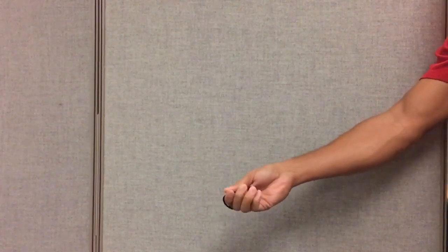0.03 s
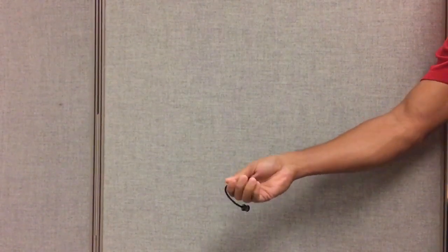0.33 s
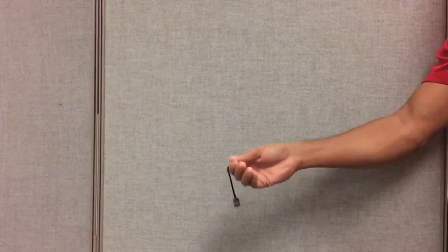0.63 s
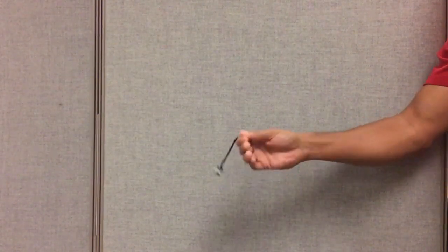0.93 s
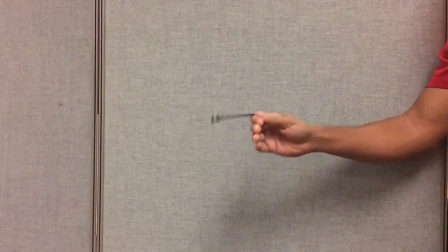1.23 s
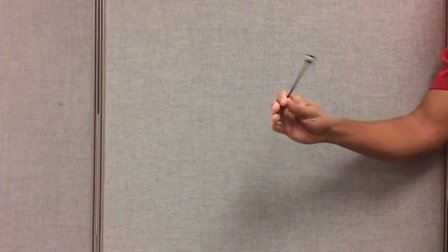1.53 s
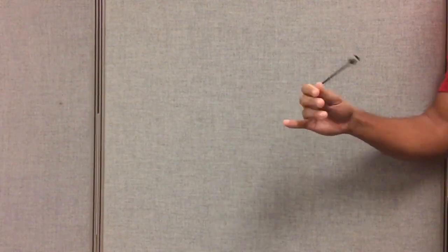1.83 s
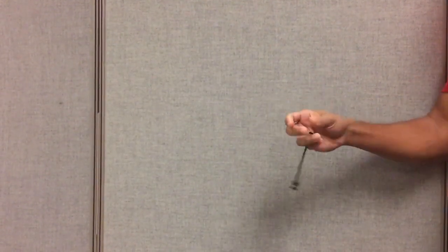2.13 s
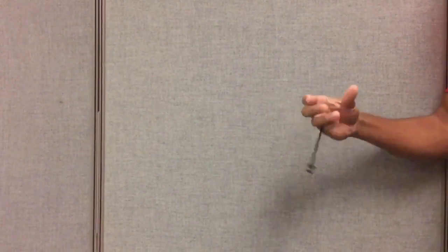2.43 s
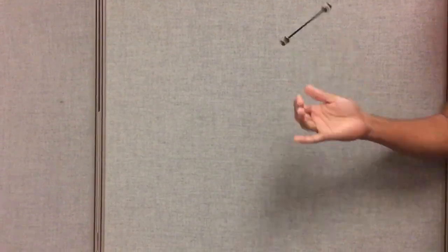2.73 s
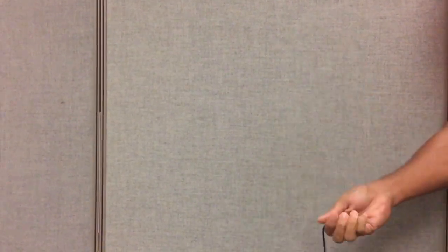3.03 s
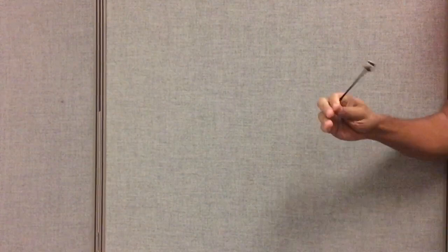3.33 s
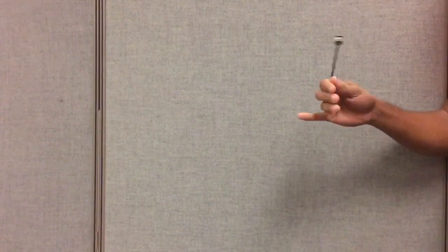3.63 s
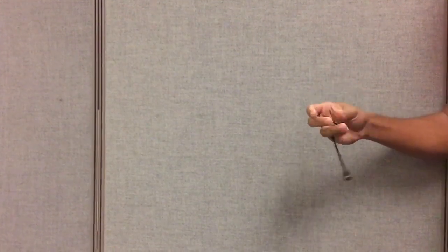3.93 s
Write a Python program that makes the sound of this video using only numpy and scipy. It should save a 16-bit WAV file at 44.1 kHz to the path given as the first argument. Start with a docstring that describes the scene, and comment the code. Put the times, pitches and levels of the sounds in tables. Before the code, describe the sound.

Low indoor air hiss rises abruptly and stays, under a few faint bead ticks and rustles.

```python
"""A small, quiet room, where a hand flips a cord toy with two end beads.
Near silence at first; about 1.7 s in, the ventilation comes up abruptly and stays: a bed of
duct rumble, air hiss and wavering fan tones. The beads knock softly on the fingers and give
a few faint, hard clicks, while the cord scuffs and slides over the skin in tiny slips.
A short, damped room tail sits behind the toy."""
import sys
import numpy as np
from scipy import signal
from scipy.fft import rfft, irfft
from scipy.io import wavfile

SR = 44100
rng = np.random.default_rng(int(sys.argv[2]) if len(sys.argv) > 2 else 0)


def generate_wav(sig):
    """Save sig (samples, or channels by samples) to the path in sys.argv[1] as 16-bit PCM at SR."""
    pcm = np.round(np.clip(np.atleast_2d(sig).T, -1, 1) * 32767).astype(np.int16)
    wavfile.write(sys.argv[1], SR, pcm)


N = 176400

# room tone spectrum (frequency [Hz], relative level [dB])
ROOM_TONE_SPECTRUM = [(2, -21), (9, 0), (25, -10), (65, -35), (100, -34.5), (300, -49.5), (550, -54.5),
                      (850, -56.5), (1300, -61.5), (2050, -63.5), (2250, -79.5), (15000, -90.5)]
# room tone fader (time [s], level [dB])
ROOM_TONE_FADER = [(0, -56), (1.55, -56.5), (1.8, -79)]
# beads landing on the fingers (time [s], level [dB], pitch [Hz], decay to -60 dB [s])
FINGER_KNOCKS = [(1.4242, -58.5, 1300, 0.014), (1.4304, -59.5, 1065, 0.022), (1.435, -66, 863, 0.038),
                 (1.444, -80, 2390, 0.034), (1.454, -84.5, 4510, 0.029), (1.5658, -66, 4550, 0.0088),
                 (1.567, -70, 1110, 0.066), (1.571, -71, 2850, 0.034), (1.579, -77.5, 6240, 0.0084)]
# bands of cord rubbing on skin; those near 1.84 s are one rub, coloured by mic and room
# (time [s], length [s], level [dB], low edge [Hz], high edge [Hz])
RUB_BANDS = [(1.44, 0.034, -82, 740, 2530), (1.447, 0.13, -99, 2220, 4220), (1.557, .03, -86, 2210, 6200),
             (1.591, 0.15, -101, 2940, 7900), (1.834, 0.14, -79.5, 5600, 7200),
             (1.838, 0.13, -80, 7650, 10100), (1.841, 0.16, -85, 9700, 14500),
             (1.849, 0.14, -82, 2500, 5000), (2.405, 0.045, -90, 10000, 15500),
             (3.041, .015, -82, 8500, 15500), (3.104, 0.072, -84, 5500, 15400),
             (3.306, 0.064, -83.5, 11000, 15000)]
# spectrum of the air in the duct (frequency [Hz], relative level [dB])
AIR_SPECTRUM = [(10, -36), (24, -31.5), (32, -24.5), (45, -12.5), (60, -1), (76, 3), (103, -10.5),
                (120, -11.5), (138, -3), (175, -15), (228, -15), (255, -23), (280, -22.5), (310, -25.5),
                (390, -30.5), (450, -35), (560, -38), (680, -31.5), (820, -40), (1230, -42), (2700, -52.5),
                (4300, -56), (4900, -59.5), (5600, -58), (6600, -58), (7500, -61.5), (8200, -60.5),
                (9900, -62), (10450, -67.5), (11000, -63.5), (15500, -65.5)]
# fan tones, ahead of the faders (frequency [Hz], level [dB])
FAN_TONES = [(74, -57), (139, -56), (223, -66), (277, -70), (367, -76), (392, -78), (757, -78), (912, -86),
             (1035, -90), (1111, -90), (1216, -91), (1244, -91), (1580, -92), (2041, -97)]
# fader for the ventilation's low end (time [s], gain [dB])
RUMBLE_FADER = [(1.3, -50), (1.45, -27.5), (1.55, -24.5), (1.62, -12.5), (1.67, -17), (1.72, 1), (1.77, -6),
                (1.85, -3), (2.1, 3.5), (2.4, -1), (4, -2)]
# fader for everything above the rumble (time [s], gain [dB])
HISS_FADER = [(1.45, -52), (1.6, -26.5), (1.67, -21.5), (1.71, -8), (1.76, -1), (1.82, .5), (2.1, 1),
              (2.4, 0), (4, 0.5)]
# hard bead contacts (time [s], peak level [dB])
BEAD_CLICKS = [(2.2763, -50.5), (3.0445, -65), (3.131, -67)]
# resonances of a bead (frequency [Hz], relative level [dB], decay to -60 dB [s])
BEAD_MODES = [(1450, -1, .018), (1900, -4, .016), (3950, -2, .018), (6600, -3, .009), (8300, -1, .005),
              (9400, -5, .005), (11100, -9, .008)]


def amp(db):
    """Decibels to gain."""
    return 10 ** (np.asarray(db) / 20)


def unit(x):
    """Scales to rms 1."""
    return x / np.sqrt(np.mean(abs(x) ** 2) + 1e-30)


def fader(points):
    """A gain ride through (time [s], level [dB]) points."""
    return amp(np.interp(np.arange(N) / SR, *np.transpose(points)))


def decay(t, t60):
    """An envelope that falls 60 dB in t60 seconds."""
    return np.exp(-np.log(1000) * t / t60)


def coloured(points):
    """Noise of rms 1, shaped by (frequency [Hz], level [dB]) points."""
    hz, db = np.transpose(points)
    bins_hz = np.fft.rfftfreq(N, 1 / SR)
    gain = amp(np.interp(np.log(bins_hz + 1), np.log(hz + 1), db))
    return unit(irfft(rfft(rng.standard_normal(N)) * gain, N))


def drift(hz):
    """Slow random motion of rms 1, rolling off above hz."""
    rolloff = np.exp(-(np.fft.rfftfreq(N, 1 / SR) / hz) ** 2)
    return unit(irfft(rfft(rng.standard_normal(N)) * rolloff, N))


def band(x, low_hz, high_hz):
    """Band-pass filter."""
    return signal.sosfilt(signal.butter(5, [low_hz, high_hz], "bandpass", fs=SR, output="sos"), x)


def room_tone():
    """A faint, dark noise floor that gives way to the ventilation."""
    return fader(ROOM_TONE_FADER) * coloured(ROOM_TONE_SPECTRUM)


def finger_knock(db, hz, t60, attack_s=.0006, grit_share=.6, band_ratio=1.35):
    """A bead lands on a finger: a damped ring roughened with grit around its pitch."""
    t = np.arange(SR // 10) / SR
    grit = unit(band(rng.standard_normal(len(t)), hz / band_ratio, hz * band_ratio))
    ring = (1 - grit_share) * np.sin(2 * np.pi * hz * t) + grit_share * grit
    return amp(db) * np.minimum(t / attack_s, 1) * decay(t, t60) * ring


def room_tail(x, t60=.22, wet_db=-6):
    """Diffuse reflections die away fast in a well-damped room."""
    t = np.arange(SR // 2) / SR
    tail = rng.standard_normal(len(t)) * decay(t, t60)
    return amp(wet_db) * signal.fftconvolve(x, tail / np.linalg.norm(tail))[:N]


def cord_rub(length, db, low_hz, high_hz, slips_per_s=1500, slip_share=.72):
    """One band of cord sliding on skin: smooth friction textured with tiny slips of the weave."""
    smooth, slip_sizes = rng.standard_normal((2, SR // 2))
    slips = unit(slip_sizes * (rng.random(SR // 2) < slips_per_s / SR))
    friction = unit(band((1 - slip_share) * smooth + slip_share * slips, low_hz, high_hz))
    progress = np.arange(0, length, 1 / SR) / length
    envelope = np.interp(progress, [0, .18, .7, 1], [0, 1, 1, 0])  # attack, hold, release
    return amp(db) * envelope * friction[:len(envelope)]


def ventilation(air_db=-44, waver_db=.5, waver_hz=17, sway_depth=.59, sway_hz=4.76, crossover_hz=105):
    """Rushing air and unsteady fan tones; the duct rumble comes up just ahead of the hiss."""
    t = np.arange(N) / SR
    air = amp(air_db + waver_db * drift(waver_hz)) * coloured(AIR_SPECTRUM)
    for hz, db in FAN_TONES:
        sway = 1 + sway_depth * (drift(sway_hz) + 1j * drift(sway_hz))  # level and phase wander
        tone = np.exp(2j * np.pi * (hz * t + rng.random()))
        air += amp(db) * unit((sway * tone).real)
    rumble = signal.sosfiltfilt(signal.butter(2, crossover_hz, fs=SR, output="sos"), air)
    hiss = air - rumble
    return rumble * fader(RUMBLE_FADER) + hiss * fader(HISS_FADER)


def bead_click(db):
    """A hard contact rings the bead's modes for a few milliseconds."""
    t = np.arange(SR // 20) / SR
    ring = sum(amp(level) * decay(t, t60) * np.sin(2 * np.pi * hz * t) for hz, level, t60 in BEAD_MODES)
    return amp(db) * ring / abs(ring).max()


def scene():
    """Mono mix: the toy and its room tail over a bed of room tone and ventilation."""
    floor = room_tone()
    toy = np.zeros(N)
    for source, cues in ((finger_knock, FINGER_KNOCKS), (bead_click, BEAD_CLICKS), (cord_rub, RUB_BANDS)):
        for start, *settings in cues:
            sound = source(*settings)
            slot = toy[round(start * SR):][:len(sound)]
            slot += sound[:len(slot)]
    return (floor + ventilation() + toy + room_tail(toy))[None]


def record(dry, cutoff_hz=15720):
    """A steep high cut on the master."""
    return signal.sosfilt(signal.ellip(12, .1, 80, cutoff_hz, fs=SR, output="sos"), dry)


dry = scene()
out = record(dry)
generate_wav(out)
```